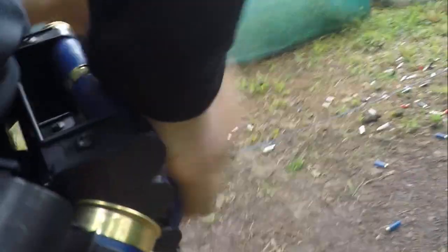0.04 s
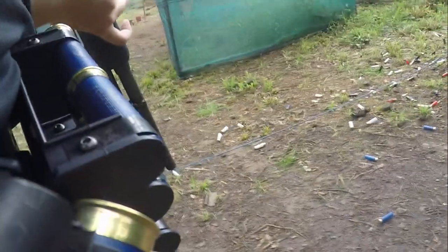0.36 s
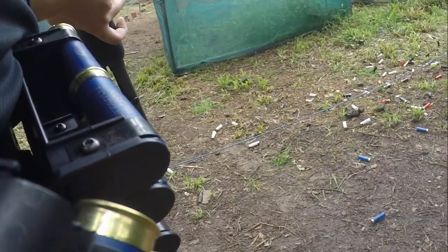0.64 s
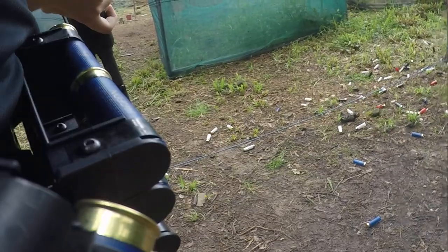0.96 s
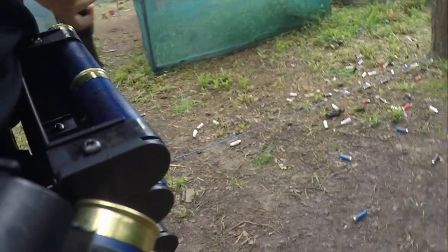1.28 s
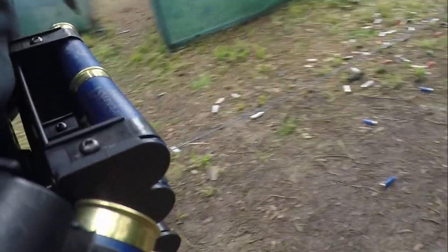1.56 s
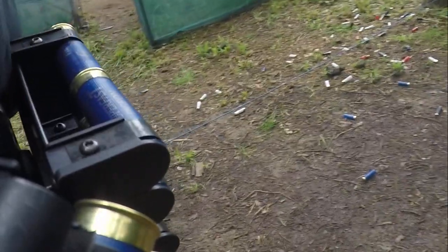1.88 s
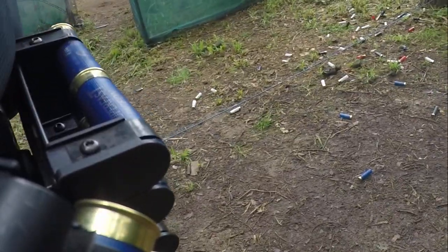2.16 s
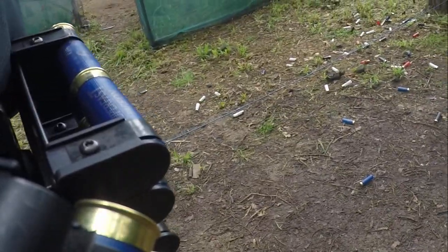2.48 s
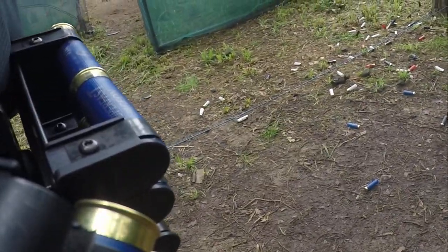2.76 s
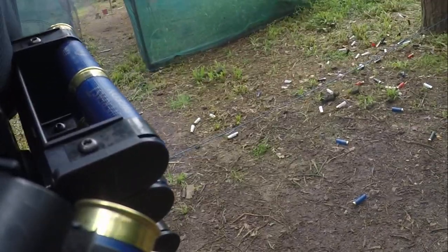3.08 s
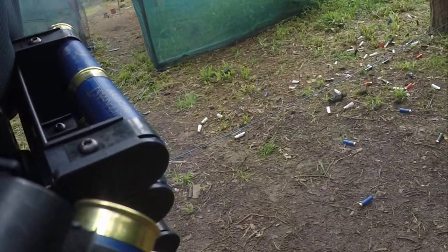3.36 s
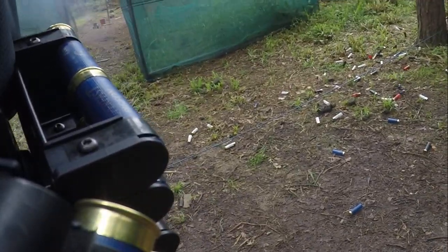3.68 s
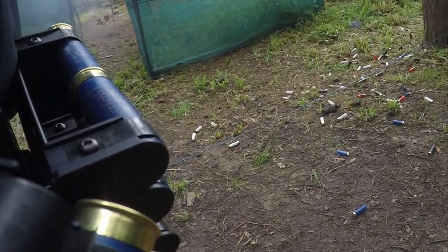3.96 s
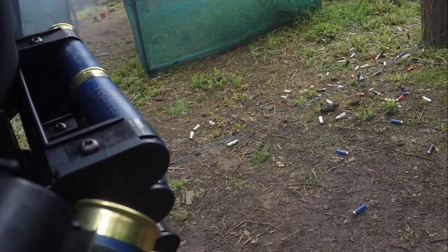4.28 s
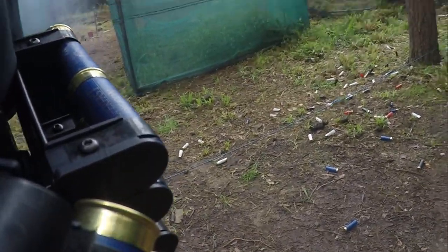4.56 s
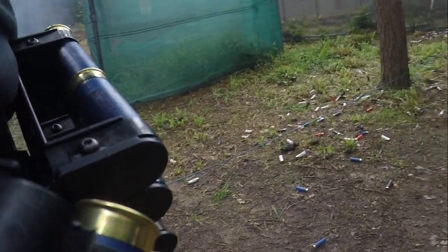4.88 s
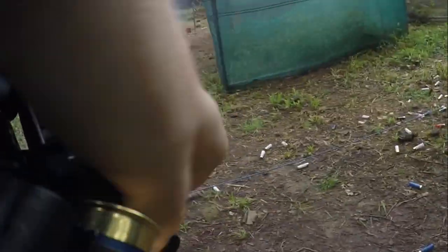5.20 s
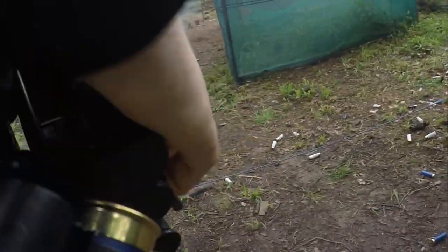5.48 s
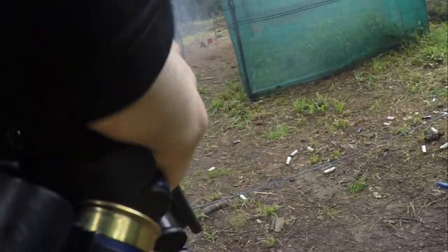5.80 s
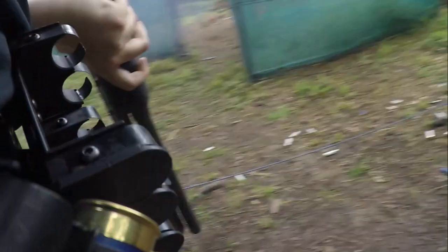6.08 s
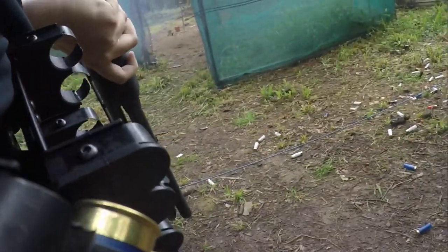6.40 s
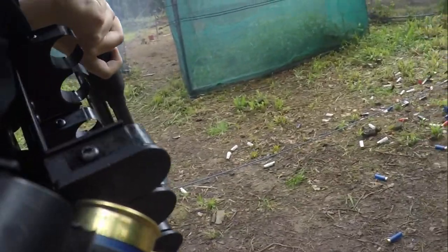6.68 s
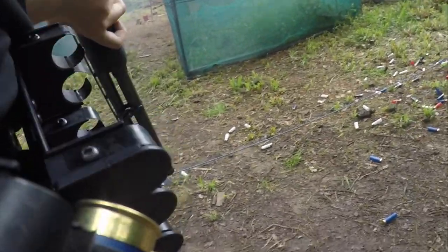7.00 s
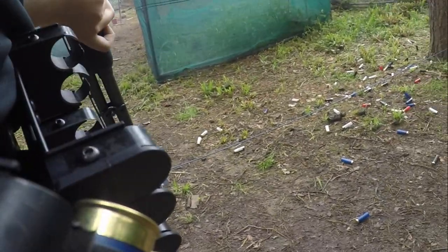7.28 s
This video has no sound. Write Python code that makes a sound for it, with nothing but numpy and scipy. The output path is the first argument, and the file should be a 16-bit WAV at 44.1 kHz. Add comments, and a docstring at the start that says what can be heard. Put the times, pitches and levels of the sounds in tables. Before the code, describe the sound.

A shell holder snaps with a short ring, and shotgun shells scrape and click into the loading port, close to the microphone. Four very loud shots follow, the last two in quick succession, each overloading the microphone and rolling away across an outdoor range. The holder snaps again and more shells click in. Faint wind and a distant drone lie underneath.

```python
"""Four shotgun shots boom and roll away over an outdoor range, heard from beside a shell belt.
Each is a shock front and a slower boom, then echoes off screens, trees and banks. Before and after,
a clip holder snaps and rings, and shells scrape and click through the gun's loading port.
Behind: air, wind, a distant drone, faint thin tones.
The shots overload the recorder, whose gain drops at once and creeps back."""
import sys
import numpy as np
from scipy import signal
from scipy.fft import rfft, irfft, next_fast_len
from scipy.io import wavfile
from scipy.ndimage import uniform_filter1d

SR = 44100
rng = np.random.default_rng(int(sys.argv[2]) if len(sys.argv) > 2 else 0)


def waveform_to_disk(signal):
    """Save audio, clipped to [-1, 1], as 16-bit WAV at the path in sys.argv[1]."""
    frames = np.transpose(np.atleast_2d(signal))
    scaled = np.clip(frames, -1, 1) * 32767
    samples = np.round(scaled).astype(np.int16)
    wavfile.write(sys.argv[1], SR, samples)


N = 323694
TIME = np.arange(N) / SR

# treble of shell and cloth friction: freq_hz, gain_db
FRICTION_EDGE = [(600, -32.5), (2000, -7), (3600, 4.5), (5000, -1.5), (6500, -7), (8500, -18.5),
                 (12000, -19), (15500, -25.5)]
# hands at work: start_s, end_s, rustle_db
HANDLING = [(0.299, 1.85, -73), (6.15, 7.34, -61)]


def shots():
    """Direct blasts, discrete echoes, nearby scatter and a long distant roll."""
    firings = [(2.8408, 38, 39, 24, -3.5), (3.4677, 31.5, 27, 19, -1), (4.4770, 37, 37.5, 25, 0),
               (4.6650, 35, 36, 20.5, 0)]  # start_s, front_db, boom_db, near_db, roll_db
    echoes = [(.006, 5.5, 0.0093), (0.013, -12.5, 0.0075), (0.036, 0.5, 0.006), (0.042, -4, 0.0082),
              (.061, -4, .008), (0.11, -12.5, 0.0093)]  # screens, trees, banks: delay_s, gain_db, smear_s
    echo_spectrum = [(40, -10), (130, 2), (260, 3), (480, -6), (850, 2), (1200, 1.5), (1700, -13),
                     (2800, -15.5), (5000, -18), (8000, -32), (15000, -38.5)]  # freq_hz, gain_db
    roll_spectrum = [(60, -13), (250, -17.5), (500, -6), (1050, 1.5), (1350, -3), (1700, -10),
                     (2500, -13.5), (4200, -4.5), (7000, -16), (15000, -30.5)]  # freq_hz, gain_db
    near_decay = [(50, 0.65), (150, 0.5), (400, 0.32), (1000, 0.45), (4000, 0.46), (14000, 0.47)]  # freq_hz, t60_s
    roll_decay = [(100, 2.5), (500, 2.82), (1000, 2.43), (2000, 1.83), (4000, 1.205), (7000, 0.96),
                  (14000, 0.64)]  # freq_hz, t60_s
    fronts, smear, t = np.zeros(N), np.zeros(N), TIME[:SR // 8]
    front, boom = blast(t, front_hz=981, front_t60_s=0.018, boom_hz=154.3, crest_s=0.0074,
                        suction_db=-12, suction_s=0.013)
    for start_s, front_db, boom_db, near_db, _ in firings:
        add(fronts, start_s, from_db(front_db) * front + from_db(boom_db) * boom)
        add(smear, start_s - 0.0015, from_db(front_db - 23.5) * np.exp(-t / 0.0012))
        add(smear, start_s, from_db(front_db - 7) * np.exp(-t / 0.0043))
        for delay_s, gain_db, smear_s in echoes:
            # part keeps the front's shape, rough ground smears the rest
            arrival_s = start_s + delay_s + rng.normal(0, 0.00077)
            envelope = np.exp(-t / smear_s) * (1 - np.exp(-t / 0.0012))
            add(fronts, arrival_s, from_db(near_db + gain_db - 7.5) * front)
            add(smear, arrival_s, from_db(near_db + gain_db - 2) * envelope)
    near = scatter([(s, db - 3) for s, _, _, db, _ in firings], echo_spectrum, near_decay, build_s=0.052)
    roll = scatter([(s, db) for s, *_, db in firings], roll_spectrum, roll_decay, build_s=0.23)
    return fronts + tint(smear * rng.standard_normal(N), echo_spectrum) + near + roll


def blast(t, front_hz, front_t60_s, boom_hz, crest_s, suction_db, suction_s):
    """The shock front rings the camera housing; the slower boom and its suction follow."""
    attack = (1 - np.exp(-t / 0.0006)) ** 2
    front = np.sin(2 * np.pi * front_hz * t) * from_db(-60 * t / front_t60_s) * attack
    phase = 2 * np.pi * boom_hz * (t - crest_s)
    steepened = np.cos(phase) - 0.47 * np.sin(2 * phase)  # a strong pressure wave leans forward
    boom = steepened * (t / crest_s * np.exp(1 - t / crest_s)) ** 8
    suction = -from_db(suction_db) * (t / suction_s * np.exp(1 - t / suction_s)) ** 8
    return front, boom + suction


def scatter(onsets, spectrum, decay, build_s, bands=14):
    """Scattered sound builds after each onset; each band dies at its own rate."""
    size = next_fast_len(N)
    noise = rfft(tint(rng.standard_normal(N), spectrum), size)
    centres_hz = np.geomspace(50, 15000, bands)
    band_index = np.interp(np.fft.rfftfreq(size, 1 / SR), centres_hz, np.arange(bands))
    out, coarse_s = np.zeros(N), TIME[::32]
    for k, hz in enumerate(centres_hz):
        band = irfft(noise * np.maximum(0, 1 - abs(band_index - k)), size)[:N]
        power = 0
        for start_s, level_db in onsets:
            age_s = np.maximum(coarse_s - start_s, 0)
            build = 1 - np.exp(-age_s / build_s)
            power += (from_db(level_db - 60 * age_s / at_hz(decay, hz)) * build) ** 2
        out += band * np.interp(TIME, coarse_s, np.sqrt(power))
    return out


def holder():
    snaps = [(0.0937, -11, -25, 0.0069, 0.0071, -18.5), (0.1317, -9, -6.5, .002, 0.0054, -17),
             (5.9715, -6, -9.5, 0.0038, 0.0063, -13), (6.014, -3.5, -6.5, 0.0017, 0.0081, -10.5)]  # peak_s, body_db, edge_db, rise_s, fall_s, thump_db
    body_spectrum = [(40, -5.5), (130, -7.5), (300, -8.5), (480, -0.5), (620, -8.5), (900, -6),
                     (1250, -1.5), (1650, -12.5), (2300, -3.5), (3000, -14), (9000, -36)]  # freq_hz, gain_db
    edge_spectrum = [(500, -15), (2000, -20), (3000, 2), (4300, -1), (5400, 3), (7000, -4.5), (9000, -13.5),
                     (13000, -20.5), (15500, -31)]  # freq_hz, gain_db
    frame_modes = [(411, -13, 0.56), (457, -11.5, 0.033), (854, -7.5, 0.19), (912, -8, 0.11),
                   (1160, -7.5, .06), (1295, -7, .12), (1400, -11, .09), (1714, -10, .05),
                   (2070, -19, 0.07), (2242, -7.5, 0.06), (2500, -10, 0.069), (4700, -34, .2),
                   (5440, -24.5, 0.16), (6310, -30, 0.11)]  # pitch_hz, gain_db, t60_s
    body, edge = np.sqrt(contact_power([row[:5] for row in snaps])) * grit(spread_db=4.5)
    chatter = from_db(1.5) * tint(body, body_spectrum) + from_db(1) * tint(edge, edge_spectrum)
    frame = sum((-1) ** k * from_db(db) * resonance(body, hz, t60_s)
                for k, (hz, db, t60_s) in enumerate(frame_modes))
    thumps, t = np.zeros(N), TIME[:SR // 4]
    swell = t / 0.0095 * np.exp(1 - t / 0.0082)
    thump = swell * (np.sin(2 * np.pi * 112 * t) + 0.56 * np.sin(2 * np.pi * 48 * t))
    for peak_s, *_, thump_db in snaps:
        add(thumps, peak_s, from_db(thump_db - 2) * thump)
    return chatter + frame + thumps


def loading():
    """Plastic hulls and brass rims scrape and click through the resonant loading port."""
    body_spectrum = [(100, -37), (350, -3.5), (700, -4.5), (1150, 6), (1650, -1), (2200, -3.5), (3200, -21),
                     (9000, -52)]  # freq_hz, gain_db
    port_modes = [(1135, 180, -6), (2070, 190, -4), (2690, 70, -3), (3470, 270, -0.5), (4270, 160, 3),
                  (4960, 150, 1.5), (5890, 110, -9)]  # shells and port: centre_hz, width_hz, gain_db
    body, edge = shell_force() * grit(spread_db=5.5)
    rub = from_db(-1) * (tint(body, body_spectrum) + tint(edge, FRICTION_EDGE))
    return rub + sum(from_db(db) * signal.lfilter(*signal.iirpeak(hz, hz / width_hz, fs=SR), rub)
                     for hz, width_hz, db in port_modes)


def shell_force(click_rise_s=0.0007, click_fall_s=0.0035, slide_db=-16.5, slide_onset_s=0.008):
    """Body and edge envelopes: rims click; pushed shells slide softly, then catch."""
    rim_clicks = [(0.3672, -25.5, -40), (0.456, -40, -39.5), (0.6396, -36, -32.5), (1.063, -16.5, -18),
                  (1.074, -19.5, -13), (1.3695, -28.5, -34), (1.5516, -30.5, -27.5), (1.758, -40, -73),
                  (2.0324, -34.5, -48), (2.0785, -40.5, -42.5), (5.8323, -32, -33.5), (6.28, -35.5, -37.5),
                  (6.301, -35, -39), (6.362, -35, -40.5), (6.548, -26, -30.5), (6.9124, -26.5, -52),
                  (6.945, -27.5, -34.5), (6.973, -27.5, -37.5), (7.1714, -24.5, -34.5), (7.194, -22, -27.5)]  # peak_s, body_db, edge_db
    pushes = [(0.377, -33, -37, 0.011, 0.0085), (0.489, -26.5, -30, 0.0067, 0.0052),
              (.5857, -27, -33, 0.02, .0055), (.858, -13.5, -15, 0.012, .003),
              (0.9667, -30, -38, 0.019, 0.0033), (1.087, -13, -11, 0.037, .0065),
              (1.268, -23.5, -20.5, 0.063, .0055), (1.3873, -16.5, -25.5, .026, 0.0029),
              (1.537, -32, -37.5, 0.017, 0.012), (5.927, -23, -35, 0.031, 0.007),
              (6.519, -27.5, -31, .003, 0.014), (6.631, -23.5, -24.5, 0.05, .014),
              (6.7821, -21.5, -23, 0.047, 0.0037), (6.989, -21, -27.5, .006, 0.0051)]  # catch_s, body_db, edge_db, slide_s, fall_s
    clicks = [(*row, click_rise_s, click_fall_s) for row in rim_clicks]
    catches = [(*row, 0.45 * fall_s, fall_s) for *row, _, fall_s in pushes]
    power = contact_power(clicks + catches)
    for catch_s, body_db, edge_db, slide_s, _ in pushes:
        span = slice(int((catch_s - slide_s) * SR), int(catch_s * SR))
        pressure = np.clip((TIME[span] - catch_s + slide_s) / slide_onset_s, 0, 1)
        power[:, span] += (from_db([[body_db], [edge_db]]) * from_db(slide_db) * pressure) ** 2
    return np.sqrt(power)


def brass_ping(start_s=1.5497, t60_s=0.16):
    """A shell head rings once, in two modes."""
    tap = np.zeros(N)
    add(tap, start_s, np.ones(1))
    return from_db(-46) * ring(tap, 6790, t60_s) + from_db(-58) * ring(tap, 10900, t60_s)


def fidgets(rate_per_s=24, level_db=-47.5, t60_s=0.004, low_hz=1600, high_hz=4000, pitches=8):
    """Fingers and loose shells tick at random pitches while the hands work."""
    activity = sum(busy(start_s, end_s) for start_s, end_s, _ in HANDLING)
    touched = rng.random(N) < activity * rate_per_s / SR
    touches = touched * from_db(level_db + 3 * np.clip(rng.standard_normal(N), -2, 1.5))
    pitch_index = rng.integers(0, pitches, N)
    scrape, ticks = grit(spread_db=7), np.zeros(N)
    pole = np.exp(-1 / (0.0031 * SR))
    for k, hz in enumerate(np.geomspace(low_hz, high_hz, pitches)):
        force = signal.lfilter([1], [1, -pole], touches * (pitch_index == k) + 1e-18)
        ticks += resonance(force * scrape, hz, t60_s)
    return signal.sosfilt(signal.butter(2, low_hz, "high", fs=SR, output="sos"), ticks)


def clothes():
    """Cloth rustles while the hands work."""
    envelope = sum(from_db(db) * busy(start_s, end_s) for start_s, end_s, db in HANDLING)
    return envelope * tint(grit(spread_db=4.5), FRICTION_EDGE)


def open_air(air_db=-53.5, wind_db=-44.5, drone_db=-49.5, swell_db=8.5, swell_s=2.16, width_s=0.5):
    """Air, wind on the microphone, and a drone that swells once like something passing far off."""
    air_spectrum = [(240, -31.5), (400, 0), (607, -3.5), (1070, -8.5), (1760, -18.5), (5350, -24.5),
                    (6240, -27), (6950, -32), (14600, -36), (16000, -52.5)]  # freq_hz, gain_db
    drone_spectrum = [(50, -18.5), (120, -2.5), (230, -0.5), (320, -6.5), (400, -16.5), (500, -14.5),
                      (700, -32), (2000, -53.5)]  # freq_hz, gain_db
    wind_spectrum = [(20, -5), (48, 3.5), (80, -6), (150, -14), (400, -23.5), (1000, -57)]  # freq_hz, gain_db
    swell = np.exp(-((TIME - swell_s) / width_s) ** 2)
    air = from_db(air_db) * tint(rng.standard_normal(N), air_spectrum)
    drone = from_db(drone_db + swell_db * swell) * tint(rng.standard_normal(N), drone_spectrum)
    wind = from_db(wind_db) * tint(rng.standard_normal(N), wind_spectrum)
    return air + drone + wind


def thin_tones(whine_hz=6175, whistle_hz=1082, whistle_start_s=2.6, whistle_end_s=2.84):
    """Narrow bands of hum, a steady whine and one faint far whistle."""
    hum_bands = [(6200, 90, -71.5), (1130, 90, -62.5)]  # centre_hz, width_hz, level_db
    hum = sum(from_db(db) * resonance(rng.standard_normal(N), hz, np.log(1000) / (np.pi * width_hz))
              for hz, width_hz, db in hum_bands)
    drift_rad = np.cumsum(rng.normal(0, 0.027, N))
    whine = from_db(-71) * np.sin(2 * np.pi * whine_hz * TIME + drift_rad)
    gate = uniform_filter1d(1.0 * ((TIME >= whistle_start_s) & (TIME < whistle_end_s)), size=2000)
    whistle = from_db(-55) * gate * np.sin(2 * np.pi * whistle_hz * TIME)
    return hum + whine + whistle


def surroundings(x, wet_db, t60_s):
    """Ground and screens return a faint short tail."""
    t = TIME[:SR // 2]
    tail = rng.standard_normal(len(t)) * from_db(-60 * t / t60_s) * (1 - np.exp(-t / 0.0037))
    return x + from_db(wet_db) * signal.fftconvolve(x, tail / np.linalg.norm(tail))[:N]


def contact_power(contacts):
    """Body and edge power: friction builds to each peak, then dies."""
    power = np.zeros((2, N))
    for peak_s, body_db, edge_db, rise_s, fall_s in contacts:
        span = slice(max(0, int((peak_s - 0.2) * SR)), int((peak_s + 0.3) * SR))
        age_s = TIME[span] - peak_s
        shape = np.exp(np.minimum(age_s / rise_s, -age_s / fall_s))
        power[:, span] += (from_db([[body_db], [edge_db]]) * shape) ** 2
    return power


def grit(spread_db, grain_samples=24):
    """Dense tiny contacts of uneven size; rms 1."""
    sizes = from_db(spread_db * np.clip(rng.standard_normal(N // grain_samples + 1), -2, 2))
    return rms_one(rng.standard_normal(N) * np.repeat(sizes, grain_samples)[:N])


def busy(start_s, end_s):
    """Gate with 0.1 s ramps."""
    return np.clip(np.minimum(TIME - start_s, end_s - TIME) / 0.1 + 0.5, 0, 1)


def ring(x, hz, t60_s):
    """One mode; a unit click starts a decaying sine of height 1."""
    radius, angle = from_db(-60 / (t60_s * SR)), 2 * np.pi * hz / SR
    return signal.lfilter([0, np.sin(angle)], [1, -2 * radius * np.cos(angle), radius ** 2], x + 1e-18)


def resonance(x, hz, t60_s):
    """One mode; keeps the power of white noise."""
    return ring(x, hz, t60_s) * np.sqrt(4 * np.log(1000) / (t60_s * SR))


def tint(x, spectrum, size=8192):
    """Minimum-phase filter; keeps the power of white noise."""
    gain = rms_one(from_db(at_hz(spectrum, np.fft.rfftfreq(size, 1 / SR))))
    cepstrum = irfft(np.log(gain))
    cepstrum[1:size // 2] *= 2
    cepstrum[size // 2 + 1:] = 0
    return signal.fftconvolve(x, irfft(np.exp(rfft(cepstrum))))[:len(x)]


def at_hz(points, hz):
    """Table lookup on a log-frequency axis."""
    freq_hz, value = np.transpose(points)
    return np.interp(np.log(np.maximum(hz, 1)), np.log(freq_hz), value)


def add(track, start_s, sound):
    start = int(round(start_s * SR))
    track[start:start + len(sound)] += sound[:N - start]


def from_db(db):
    return 10 ** (np.asarray(db) / 20)


def rms_one(x):
    return x / np.sqrt(np.mean(x ** 2) + 1e-20)


def scene():
    """Shots, reloading and background at one microphone."""
    shells = surroundings(loading() + brass_ping() + fidgets(), wet_db=-18, t60_s=0.4)
    snaps = surroundings(holder(), wet_db=-26, t60_s=0.52)
    return (shots() + snaps + shells + open_air() + clothes() + thin_tones())[None]


def gain_control(x, threshold_db, release_db_per_s, attack_s, ahead_s):
    """Look-ahead limiter: ducks fast, recovers slowly."""
    level_db = 10 * np.log10(np.maximum(uniform_filter1d(x ** 2, size=440), 1e-12))
    excess_db = np.maximum(level_db - threshold_db, 0)
    recovery_db = release_db_per_s * TIME
    duck_db = np.maximum.accumulate(excess_db + recovery_db) - recovery_db
    pole = np.exp(-1 / (attack_s * SR))
    duck_db = signal.lfilter([1 - pole], [1, -pole], duck_db)
    return x * from_db(-np.interp(TIME + ahead_s, TIME, duck_db))


def record(dry):
    """Gain control, flat-topped overload, steep low-pass."""
    x = gain_control(dry[0], threshold_db=1, release_db_per_s=13.5, attack_s=0.01, ahead_s=0.012)
    clipped = 0.97 * x / (1 + x ** 6) ** (1 / 6)
    cutoff_hz = 15450
    return signal.sosfilt(signal.ellip(10, 0.2, 80, cutoff_hz, fs=SR, output="sos"), clipped)[None]


dry = scene()
out = record(dry)
waveform_to_disk(out)
```